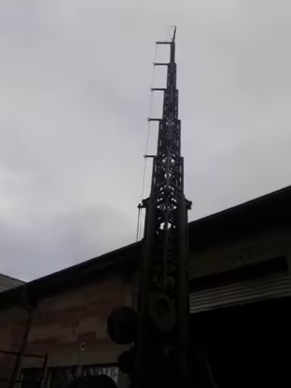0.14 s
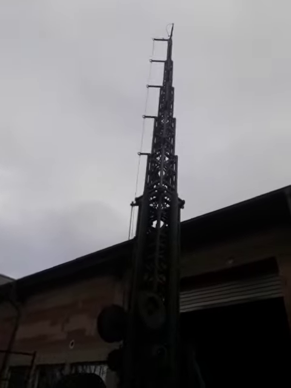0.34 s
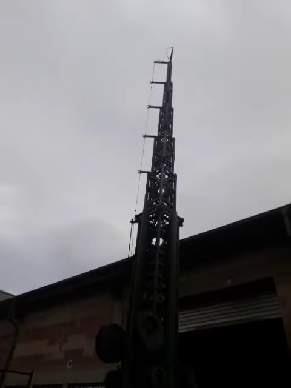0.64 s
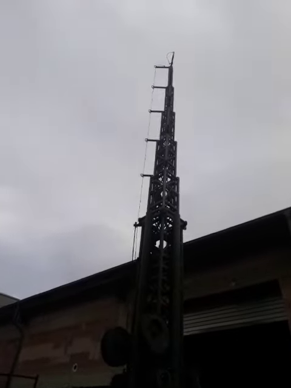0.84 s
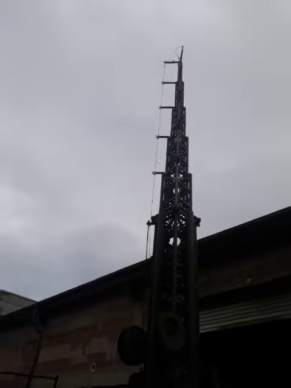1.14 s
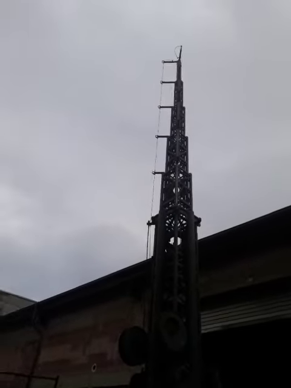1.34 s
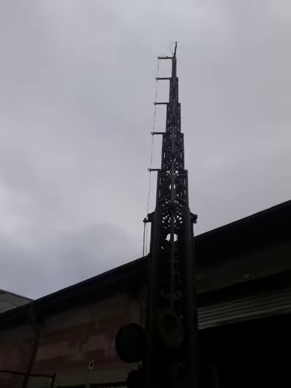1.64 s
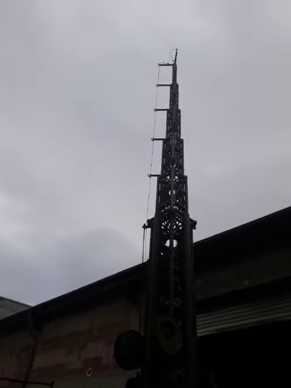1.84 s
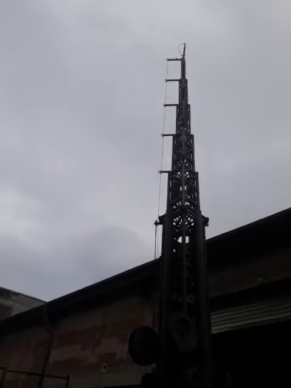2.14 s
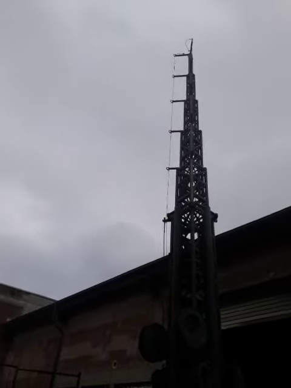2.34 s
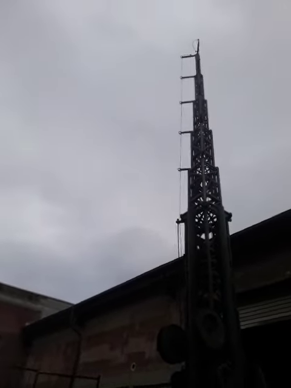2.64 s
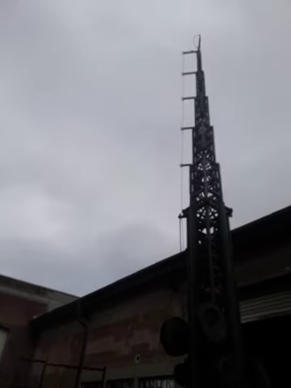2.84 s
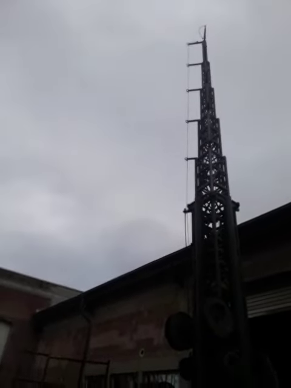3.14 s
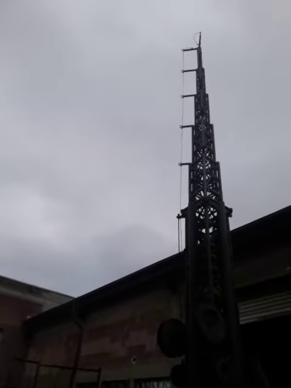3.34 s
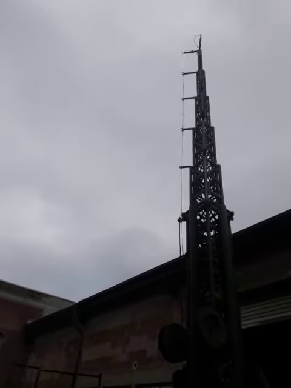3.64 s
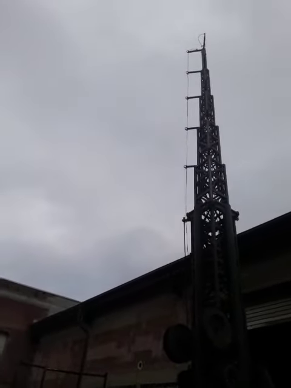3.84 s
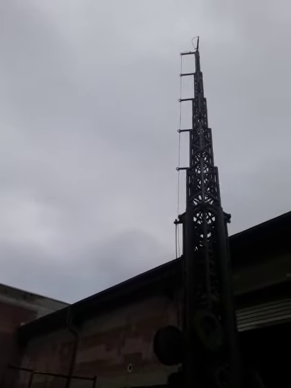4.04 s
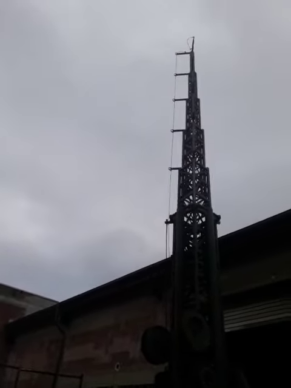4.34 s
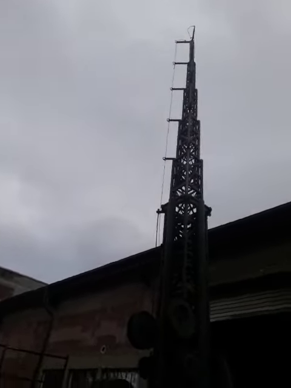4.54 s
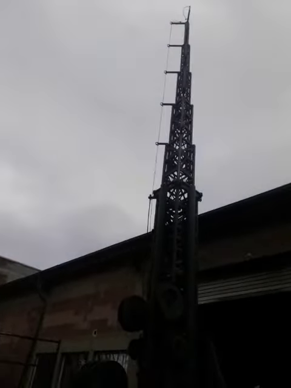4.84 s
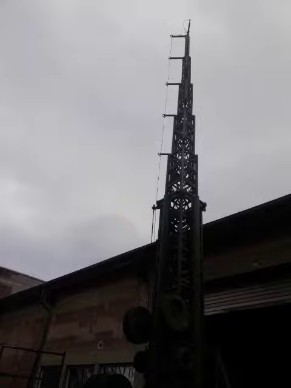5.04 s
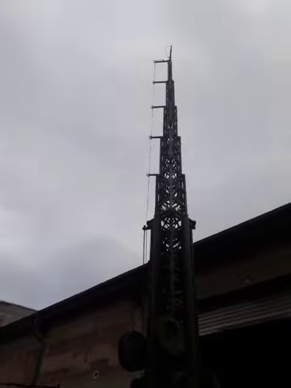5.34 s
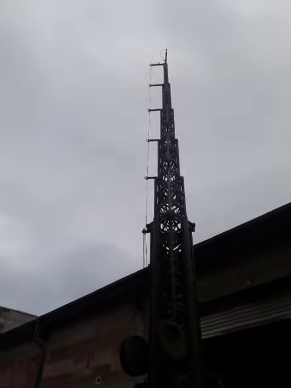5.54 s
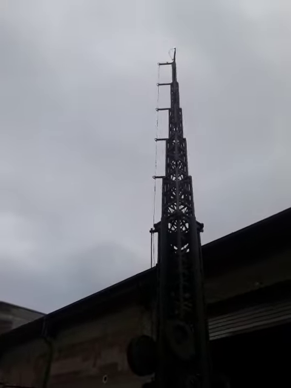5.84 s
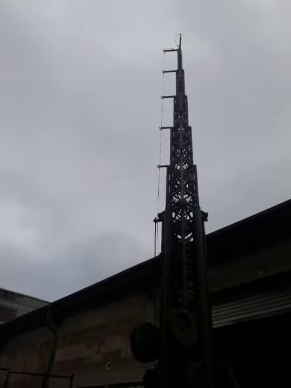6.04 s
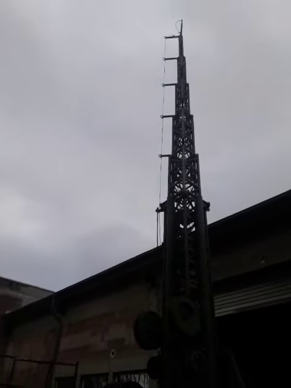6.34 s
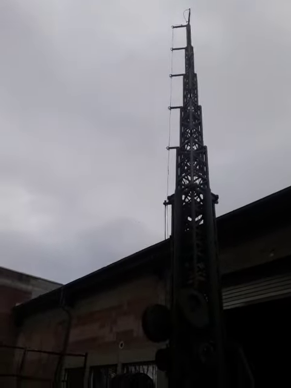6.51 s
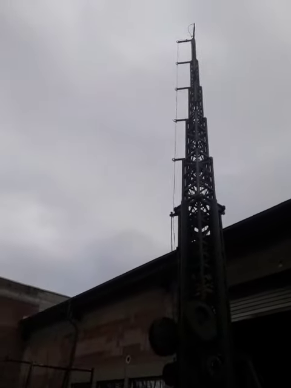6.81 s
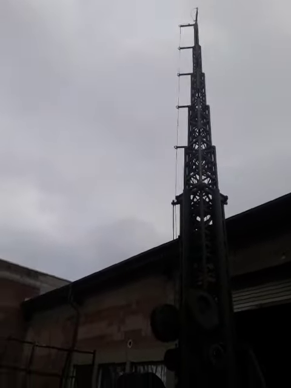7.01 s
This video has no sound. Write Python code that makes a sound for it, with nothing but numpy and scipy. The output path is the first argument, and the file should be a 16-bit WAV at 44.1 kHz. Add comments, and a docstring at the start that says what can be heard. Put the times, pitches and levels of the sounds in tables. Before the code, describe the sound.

An electric winch is already running at 0 s and continues to the end, about 7.2 s. Its gear whine sits near 355 Hz, rich in buzzing harmonics, fluttering roughly nine times per second over a faint drone an octave lower. A rough metallic rasp and dry brush hiss surround it. A cable scrape squeals briefly at 0.3 s; softer grating swells come near 1.6, 3.1, 4.4 and 5.9 s. A hand knocks the microphone at 1.4 s, with faint rubbing after; small bright scuffs pass at 2.05, 3.0 and 4.0 s. Pitch sags slightly near 3.8 s, then recovers. Light bumps occur at 3.0 and 4.5 s, crisp grainy rustles around 5.1 s. From 5 to 5.4 s the hum becomes fuller and steadier, edging up towards 361 Hz. Soft thuds and a rustle cluster at 7.0 s. Handheld mono pickup in an outdoor yard, without extreme treble.

```python
"""In a yard, an electric winch runs steadily, raising a steel lattice mast.
Its 40-tooth gear whines: mesh harmonics and sidebands locked to the shaft throb once per turn, over a lower drone.
Noise shaped by worn teeth, brushes and the ringing housing rasps; cable scrapes and mast scuffs swell briefly.
The whine grows fuller as the load eases and the motor speeds up.
The hand that holds the microphone bumps its case, ringing decaying modes, and rubs it, giving grainy bright noise."""
import sys
import numpy as np
from scipy import signal
from scipy.fft import rfft, irfft, next_fast_len
from scipy.io import wavfile
from scipy.ndimage import map_coordinates

SR = 44100
rng = np.random.default_rng(int(sys.argv[2]) if len(sys.argv) > 2 else 0)


def waveform_to_disk(signal):
    """Save audio, clipped to [-1, 1], as 16-bit WAV at the path in sys.argv[1]."""
    frames = np.transpose(np.atleast_2d(signal))
    scaled = np.clip(frames, -1, 1) * 32767
    samples = np.round(scaled).astype(np.int16)
    wavfile.write(sys.argv[1], SR, samples)


N = 316197
TIME = np.arange(N) / SR  # s
TEETH = 40


def from_db(db):
    """Decibel law: a level is twenty times the logarithm of an amplitude ratio."""
    return 10 ** (np.asarray(db) / 20)


def rms_one(x):
    """Normalisation: unit root-mean-square amplitude."""
    return x / np.sqrt(np.mean(x ** 2) + 1e-20)


def in_time(rows):
    """Linear interpolation: each column of a curve at every sample."""
    t, *columns = np.transpose(rows)
    return [np.interp(TIME, t, column) for column in columns]


def drift(rate_hz):
    """Low-passed noise: a slow random fluctuation of unit rms, with a bandwidth of about rate_hz."""
    step, settling = 40, 2000  # samples per slow value; slow values discarded
    pole = np.exp(-2 * np.pi * step * rate_hz / SR)
    noise = rng.standard_normal(N // step + settling + 2)
    slow = signal.lfilter([1], [1, -2 * pole, pole * pole], noise)[settling:]
    return np.interp(np.arange(N) / step, np.arange(len(slow)), rms_one(slow))


def colour(x, spectrum, resonances=()):
    """Linear filtering: a broad spectrum with narrow resonant peaks and notches; the result has unit rms."""
    size = next_fast_len(N)
    hz = np.maximum(np.arange(size // 2 + 1) * SR / size, 1)
    points = np.array(spectrum)
    db = np.interp(np.log(hz), np.log(points[:, 0]), points[:, 1])
    for centre, width, peak_db in resonances:
        db = db + peak_db / (1 + (2 * (hz - centre) / width) ** 2)
    return rms_one(irfft(rfft(x, size) * from_db(db), size)[:N])


def split(x, hz):
    """Complementary filtering: the parts of a sound below and above a frequency."""
    low = signal.sosfiltfilt(signal.butter(2, hz, fs=SR, output="sos"), x)
    return low, x - low


def swell(peak_s, half_width_s, db):
    """Gaussian envelope: a bell-shaped rise and fall, down to 1/e^2 at the half-width."""
    return from_db(db) * np.exp(-2 * ((TIME - peak_s) / half_width_s) ** 2)


# start and end of the teeth's move to a second seating: (t/s, t/s)
RESEATING = (4.95, 5.4)


def seated(first, second):
    """Change of contact: a quantity passes from its value in the first seating to that in the second."""
    return np.interp(TIME, RESEATING, (first, second))


# tooth-contact frequencies at which the strength of a resonant tone is given: (f/Hz, ...)
SPEED_STEPS = (351, 354, 356.8, 358.8, 360.5)


def at_speed(speed, levels_db):
    """Resonance: a small change of speed moves a tone on or off a narrow mode of the frame."""
    return from_db(np.interp(speed, SPEED_STEPS, levels_db))


# motor speed, sagging and recovering with the load: (t/s, tooth-contact f/Hz)
MOTOR_SPEED = [(0.0, 356.2), (0.2, 356.3), (0.37, 355.6), (0.5, 356.2), (0.9, 355.3), (1.25, 354.2),
               (1.5, 355.1), (1.65, 353.4), (1.8, 354.1), (2.05, 357.7), (2.5, 355.4), (2.78, 355.9),
               (2.97, 353.9), (3.15, 354.1), (3.32, 355.7), (3.5, 354.0), (3.77, 349.6), (3.98, 353.4),
               (4.1, 354.1), (4.42, 352.0), (4.63, 356.7), (4.82, 356.0), (5.15, 358.0), (5.38, 358.0),
               (5.75, 360.5), (5.97, 360.3), (6.15, 361.0), (6.55, 359.1), (7.17, 361.3)]


def motor_speed():
    """Kinematics: the tooth-contact frequency follows the speed of the motor."""
    speed, = in_time(MOTOR_SPEED)
    return speed


def shaft_turns(speed):
    """Phase integration: the gear's angle in turns sums its speed and a wobble within the tooth play."""
    wobble = seated(.085, .042) * drift(7)  # radians of one tooth contact, rms
    return (np.cumsum(speed) / SR + wobble / (2 * np.pi)) / TEETH


def partial(turns, per_turn, phase, waver):
    """Order tracking: a unit-rms tone locked to the shaft, wavering in strength and phase."""
    angle = 2 * np.pi * (per_turn * turns + phase)
    in_phase = (1 + waver * drift(7.2)) * np.cos(angle)
    quadrature = waver * drift(4.2) * np.sin(angle)
    return np.sqrt(2 / (1 + 2 * waver ** 2)) * (in_phase + quadrature)


# fingers rubbing on the case: (start t/s, length t/s, relative level/dB)
RUBS = [(1.04, .06, -63), (1.425, .03, -59), (1.5, .48, -66), (2.3, .2, -66), (2.9, .33, -62.5),
        (2.98, .17, -64), (3.95, .14, -63), (4.026, .018, -53), (4.34, .006, -47), (4.386, .004, -56),
        (4.52, .16, -66), (5.047, .066, -49), (5.116, .016, -46), (6.96, .16, -57.5)]
# colour of the rubbing: (f/Hz, relative spectral density level/dB)
RUB_COLOUR = [(3000, -30), (8500, -6), (11000, 1), (13500, 2), (15800, -4)]


def rubs():
    """Stick-slip friction: skin on the case gives short, grainy, very bright rustles."""
    def push(start_s, length_s):
        progress = np.clip((TIME - start_s) / length_s, 0, 1) ** .7  # rises faster than it falls
        return np.sqrt(np.abs(np.sin(np.pi * progress)))

    pressure = sum(from_db(db) * push(start_s, length_s) for start_s, length_s, db in RUBS)
    grain_db = 4 * drift(400)
    return pressure * colour(rng.standard_normal(N) * from_db(grain_db), RUB_COLOUR)


# soft bumps of the hand: (start t/s, relative level/dB, lightness of touch/dB per octave)
BUMPS = [(1.427, -33, 7), (2.969, -43, -5), (4.535, -45, -3), (7.002, -39.5, 2), (7.026, -34.5, -6),
         (7.06, -43, -7)]
# modes of the microphone's case: (f/Hz, relative level/dB, 60 dB decay time t/s)
CASE = [(122, -15.5, 0.09), (182, -4.5, 0.084), (263, 6, 0.053), (292, -9, 0.12)]


def bumps(trim_db=7.5, contact_s=0.0042):
    """Modal decay: a soft push rings the microphone's case; a light touch excites the lowest modes less."""
    out, age = np.zeros(N), TIME[:SR // 4]
    top_hz = CASE[-1][0]
    onset = (1 - np.exp(-age / contact_s)) ** 2
    for start_s, db, lightness in BUMPS:
        thud = 0
        for hz, mode_db, t60 in CASE:
            decay_db = mode_db + lightness * np.log2(hz / top_hz) - 60 * age / t60
            thud = thud + from_db(decay_db) * np.sin(2 * np.pi * (hz * age + rng.random()))
        start = round(start_s * SR)
        out[start:start + len(age)] += (from_db(db + trim_db) * thud * onset)[:N - start]
    return out


# short bright scuffs in the mast: (peak t/s, half-width t/s, relative level/dB, brightest f/Hz)
SCUFFS = [(2.055, .025, -40, 6800), (4.032, .014, -43, 7200), (2.987, .014, -36, 4300)]
# colour of a scuff: (multiple of its brightest f, relative spectral density level/dB)
SCUFF_COLOUR = [(.37, -30), (.74, -5), (1, 0), (1.18, -10), (1.47, -28), (2.2, -45)]


def scuffs(trim_db=-0.5):
    """Friction noise: something in the mast brushes past, briefly and brightly."""
    out = 0
    for peak_s, half_width_s, db, hz in SCUFFS:
        noise = colour(rng.standard_normal(N), np.array(SCUFF_COLOUR) * [hz, 1])
        out = out + swell(peak_s, half_width_s, db + trim_db) * noise
    return out


# the cable scrapes as the drum winds it in: (peak t/s, half-width t/s, level/dB, squeal 0-1)
SCRAPES = [(.292, .06, -31.5, 1), (1.61, .11, -35.5, .1), (3.115, .1, -35.5, .7), (4.44, .09, -33.5, .3),
           (5.92, .12, -36.5, .5)]
# colour of the scrape: (f/Hz, relative spectral density level/dB)
SCRAPE_COLOUR = [(60, -50), (250, -16), (350, 5), (430, -1), (550, -10), (800, -3), (1300, -3), (2100, -3),
                 (2400, -16), (3300, -10), (6000, -26), (12000, -60)]
# squealing modes: (f/Hz, width f/Hz, gain level/dB at full squeal)
SCRAPE_MODES = [(1760, 60, 9), (1985, 110, 12)]


def scrapes():
    """Friction-excited resonance: the cable slips in short grating swells; some of them squeal."""
    grain_db = 1.5 * drift(80)
    slips = rng.standard_normal(N) * from_db(grain_db)
    out = 0
    for peak_s, half_width_s, db, squeal in SCRAPES:
        modes = np.array(SCRAPE_MODES) * [1, 1, squeal]
        out = out + swell(peak_s, half_width_s, db) * colour(slips, SCRAPE_COLOUR, modes)
    return out


# strength of the slow gear stage's tone, one value per speed step: (level/dB, ...)
DRONE_LEVELS = (-67, -58.5, -55, -58, -72)


def drone(turns, speed):
    """Gear ratio: a slower stage, at 19.2 cycles per turn, drones about an octave under the whine."""
    return at_speed(speed, DRONE_LEVELS) * partial(turns, 19.2, rng.random(), waver=0.092)


# colour of the rasp: (f/Hz, relative spectral density level/dB)
RASP_COLOUR = [(25, -110), (55, -90.5), (130, -81.5), (270, -76.5), (420, -69), (530, -74.5), (720, -71),
               (1900, -68), (3500, -66), (4200, -72), (7100, -79), (8300, -94.5), (11300, -98.5),
               (15700, -110)]
# resonances of housing and mast, and the notches between them: (f/Hz, width f/Hz, gain level/dB)
HOUSING = [(209, 45, 2), (417, 8.7, -14.5), (532, 74, -5), (1064, 41, 8.5), (1392, 34, 8.5),
           (1767, 25, 9.5), (1990, 48, 3.5), (2353, 78, -12.5), (2557, 59, -11), (2845, 35, 8),
           (2960, 46, 2.5), (3785, 37, 4), (4450, 200, -10), (4580, 57, 12.5), (4900, 78, 9),
           (5104, 43, 10.5), (5260, 55, -7.5), (6580, 76, 7.5), (7160, 110, -3), (7140, 86, 12.5)]
# finer peaks and notches of the lattice and the yard's walls: (f/Hz, width f/Hz, gain level/dB)
LATTICE = [(889, 26, 3.0), (955, 22, -4.5), (1259, 43, 3.0), (2047, 43, -3.5), (2208, 33, -4.0),
           (2378, 27, 3.5), (2440, 30, -6.5), (2555, 22, 4.5), (2674, 22, -6.5), (3030, 39, 3.5),
           (3268, 22, 4.0), (3401, 172, -2.0), (3681, 63, -3.5), (3761, 35, 3.0), (3906, 33, -3.0),
           (4051, 42, 3.0), (4145, 63, -4.0), (4571, 36, -4.0), (4660, 27, 3.5), (4991, 54, 3.5),
           (5110, 22, -3.5), (5186, 63, -5.0), (5379, 46, 4.0), (5572, 128, -3.5), (6414, 39, -7.5),
           (6912, 79, -3.5), (7122, 37, -5.0), (8441, 51, 5.0), (8622, 209, -2.5), (9541, 42, 5.0),
           (9723, 122, -5.0)]
# strength of the brushes' hiss: (t/s, relative level/dB)
HISS = [(0.0, -39), (0.4, -40), (2.29, -38.5), (2.85, -40), (2.87, -38.5), (4.93, -40), (5.97, -38.5),
        (7.17, -38)]


def rasp(turns, rattle_db=-32.5, hiss_trim_db=6.0, repeating=0.39, wear_hz=2400, hiss_hz=2800):
    """Forced vibration: sliding teeth shake the housing; the same worn spots recur on every turn."""
    flanks = rng.standard_normal(size=4800)  # roughness around one turn
    worn = rms_one(map_coordinates(flanks, [turns % 1 * len(flanks)], order=3, mode="grid-wrap"))
    smooth, fine = split(rng.standard_normal(N), wear_hz)
    worn_low, _ = split(worn, wear_hz)
    force = np.sqrt(repeating) * worn_low + np.sqrt(1 - repeating) * smooth + fine
    # friction pulses with each tooth, each turn of the rotor (five to one) and each turn of the gear
    angle = 2 * np.pi * turns
    force *= 1 + .05 * np.cos(TEETH * angle) + .015 * np.cos(5 * angle) + .025 * np.cos(angle)
    # friction also differs from tooth to tooth
    unevenness = rng.standard_normal(TEETH)
    force *= 1 + .1 * np.interp(turns * TEETH, np.arange(TEETH), unevenness, period=TEETH)
    low, high = split(colour(force, RASP_COLOUR, HOUSING + LATTICE), hiss_hz)
    hiss_db, = in_time(HISS)
    return from_db(rattle_db) * low + from_db(hiss_db + hiss_trim_db) * high


# hum of the tooth contacts: (relative level/dB in first seating, in second)
HUM_LEVELS = (-39, -32)
# third harmonic, one value per speed step: (relative level/dB, ...)
THIRD_LEVELS = (-71, -52.5, -44, -50.5, -56)
# the other mesh harmonics: (harmonic, relative level/dB in first seating, in second)
MESH = [(2, -56, -58), (4, -51, -50), (5, -50.5, -42.0), (6, -47.5, -43), (7, -55, -45), (8, -43.5, -49.5),
        (9, -51, -50), (10, -49, -44.5), (11, -55.5, -54.5), (12, -65.5, -65.0), (13, -53, -52.5),
        (14, -55, -50), (15, -63.5, -60.0), (16, -62.0, -65.5), (17, -71.0, -69.5), (18, -70.5, -70.0),
        (19, -67.0, -70.5), (20, -68.5, -71.0), (30, -80, -77), (31, -80, -79), (32, -80, -77)]
# sidebands from uneven teeth: (cycles per turn, relative level/dB in first seating, in second)
SIDEBANDS = [(32, -73.0, -58.0), (36, -63.0, -56.0), (37, -73.0, -58.0), (39, -58, -62), (41, -55, -55),
             (42, -58.5, -57.0), (43, -59.0, -63.5), (44, -51.5, -60.0), (45, -48.5, -63.0),
             (47, -62.5, -63.5), (48, -56.5, -58), (52, -61.5, -55.5), (60, -63.0, -66.5),
             (68, -62.5, -57.0), (70, -62.0, -61.5), (75, -59.5, -57.5), (76, -60.0, -58.5),
             (77, -60.0, -64.5), (82, -60.5, -61.0), (83, -61.5, -59.0), (84, -63.5, -58.5),
             (85, -68.5, -59.5), (88, -62, -64), (90, -64.0, -53.0), (91, -63.5, -59.5), (92, -52.5, -51),
             (96, -62, -57), (104, -60.5, -59.0), (105, -61.0, -62.0), (106, -63.0, -64.5),
             (112, -56.0, -64.5), (115, -60.5, -55.0), (116, -54.5, -49.0), (117, -56.0, -53.5),
             (118, -56, -47.5), (119, -44.5, -42.0), (121, -57, -61), (124, -62.5, -49),
             (125, -49.5, -49.5), (140, -55.0, -53.0), (145, -57.0, -58.5), (148, -58.0, -56.5),
             (156, -49.0, -41.0), (158, -43, -46.5), (159, -48, -62), (161, -58, -60), (190, -59.5, -54.5),
             (193, -56.0, -59.5), (196, -56.0, -60.0), (198, -59.0, -54.0), (201, -53.0, -53.0),
             (203, -60.5, -53.5), (204, -60.0, -52.5), (208, -62.0, -55.0), (212, -59.5, -53.5),
             (220, -54.0, -55.5), (236, -51.5, -50.0), (238, -55.0, -61.5), (239, -56, -49.5),
             (304, -54.5, -57.0), (308, -60.0, -54.5), (312, -56.0, -58.5), (317, -58.0, -61.0),
             (319, -57, -56), (324, -54.0, -49.5), (332, -58.5, -53.5), (340, -55.5, -54.5),
             (352, -61.0, -53.0), (364, -62.0, -53.5), (396, -56.0, -62.5), (399, -60, -52)]
# off-centre running makes each harmonic peak at its own point: (harmonic, turns, throb depth 0-1)
HIGH_SPOTS = [(1, .5, .02), (2, .6, 0), (3, .66, .14), (4, .76, 0), (5, 1.15, .05), (6, .3, .08),
              (7, .7, .02), (8, 1.13, .02), (10, 1.1, .12)]
# a harmonic sings out and fades: (harmonic, peak t/s, half-width t/s, relative added level/dB)
SWELLS = [(4, 3.83, 0.41, -52.5), (4, 4.35, 0.15, -49.5), (5, 1.29, 0.7, -44.5), (5, 2.13, 0.11, -48.5),
          (5, 3.09, 0.7, -47.5), (5, 4.11, 0.16, -47.5), (5, 5.48, 0.63, -49.5), (6, 1.7, 0.14, -41.5),
          (6, 3.08, 0.14, -43.5), (6, 3.76, 0.32, -41.0), (6, 4.37, 0.26, -43.0), (6, 6.68, 0.39, -45.5),
          (7, 1.71, 0.16, -50.0), (7, 2.79, 0.64, -51.5), (7, 3.6, 0.14, -45.5), (7, 4.18, 0.48, -44),
          (7, 6.67, 0.39, -51.5), (8, 0.01, 0.16, -40.5), (8, 0.26, 0.08, -42), (8, 1.69, 0.2, -45.0),
          (8, 2.17, 0.26, -38), (8, 2.62, 0.28, -46.0), (8, 3.1, 0.3, -47), (8, 4.29, 0.17, -46.5),
          (8, 5.13, 0.4, -43.5), (8, 5.55, 0.15, -42.0), (8, 5.95, 0.12, -43.0), (8, 6.54, 0.32, -38.0),
          (9, 1.3, 0.35, -48.5), (9, 1.72, 0.2, -48.0), (9, 3.05, 0.3, -49), (9, 4.19, 0.39, -49.0),
          (10, 1.7, 0.2, -50), (10, 3.1, 0.2, -50), (10, 1.25, 0.17, -48.0), (10, 2.15, 0.15, -47.5),
          (10, 5.53, 0.1, -49.0), (13, 2.68, 0.09, -55.5), (13, 6.34, 0.1, -56.0), (14, 3.78, 0.1, -47.5),
          (14, 5.13, 0.08, -52.5), (14, 6.45, 0.46, -51.5), (14, 7.16, 0.18, -49.0)]


def whine(turns, speed, hum_trim_db=1.14, third_trim_db=5, mesh_trim_db=2.0, swell_trim_db=0.3, sideband_trim_db=0.18):
    """Gear-mesh modulation: tooth-contact harmonics, with sidebands that beat against them every turn."""
    phases = rng.random(TEETH)  # cycles
    harmonics, high_spots, depths = np.transpose(HIGH_SPOTS)
    mesh_waver, waver_per_harmonic = .09, .018  # shares of strength
    sideband_stray = .3  # radians rms
    throb_smear = .25  # the frame delays neighbouring sidebands, stretching each throb (cycles)

    def strength(levels_db):
        return seated(*from_db(levels_db))

    def past_high_spot(harmonic):
        return turns - np.interp(harmonic, harmonics, high_spots)

    def throb(harmonic):
        depth = np.interp(harmonic, harmonics, depths)
        return (1 + depth * np.cos(2 * np.pi * past_high_spot(harmonic))) / (1 + depth / 2)

    def tone(harmonic, waver):
        cycles = partial(past_high_spot(harmonic), harmonic * TEETH, phases[harmonic], waver)
        return throb(harmonic) * cycles

    wander_db = seated(1.7, .4) * drift(6)  # the hum wanders more under heavy load
    out = from_db(hum_trim_db + wander_db) * strength(HUM_LEVELS) * tone(1, waver=0.075)
    out += from_db(third_trim_db) * at_speed(speed, THIRD_LEVELS) * tone(3, mesh_waver)
    for harmonic, *levels in MESH:
        singing = 0
        for which, peak_s, half_width_s, db in SWELLS:
            if which == harmonic:
                singing = singing + swell(peak_s, half_width_s, db + swell_trim_db)
        amplitude = from_db(mesh_trim_db) * strength(levels) + singing
        out += amplitude * tone(harmonic, mesh_waver + waver_per_harmonic * harmonic)
    for per_turn, *levels in SIDEBANDS:
        # a harmonic's closest neighbours swell with it around the high spot; the others lie anywhere
        nearest = round(per_turn / TEETH)
        offset = per_turn - nearest * TEETH
        close = abs(offset) <= 2
        phase = phases[nearest] + throb_smear * offset * (offset + 1) / 2
        if not close:
            phase += rng.random()
        angle = 2 * np.pi * (per_turn * past_high_spot(nearest) + phase) + sideband_stray * drift(2.8)
        amplitude = np.sqrt(2) * from_db(sideband_trim_db) * strength(levels)
        out += amplitude * np.cos(angle) * (throb(nearest) if close else 1)
    return out


def scene():
    """Superposition: the hand at the microphone, the mast, the cable and the winch add linearly."""
    speed = motor_speed()
    turns = shaft_turns(speed)
    hand = rubs() + bumps()
    mast_and_cable = scuffs() + scrapes()
    winch = drone(turns, speed) + rasp(turns) + whine(turns, speed)
    return (hand + mast_and_cable + winch)[None]


def record(dry):
    """Elliptic low-pass filtering: the top is cut steeply above 15750 Hz."""
    return signal.sosfilt(signal.ellip(12, .1, 90, 15750, fs=SR, output="sos"), dry)


dry = scene()
out = record(dry)
waveform_to_disk(out)
```